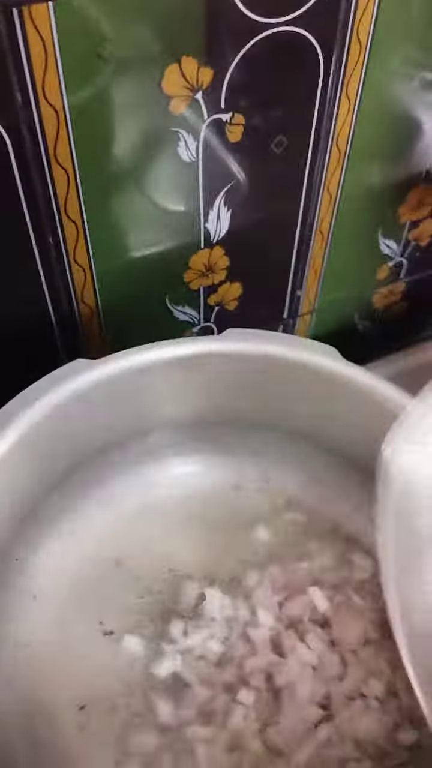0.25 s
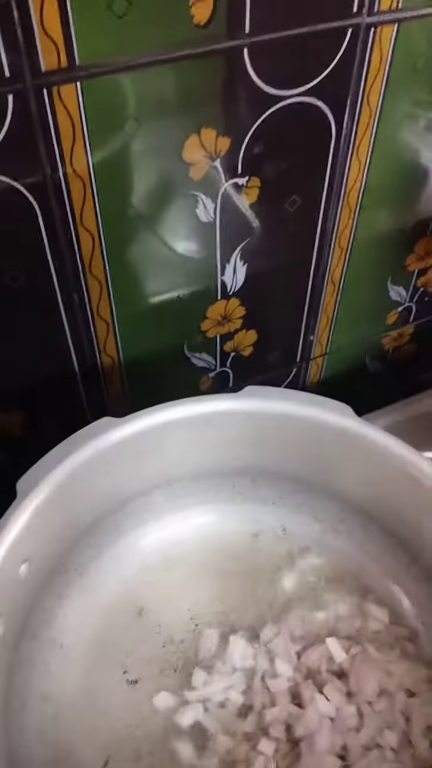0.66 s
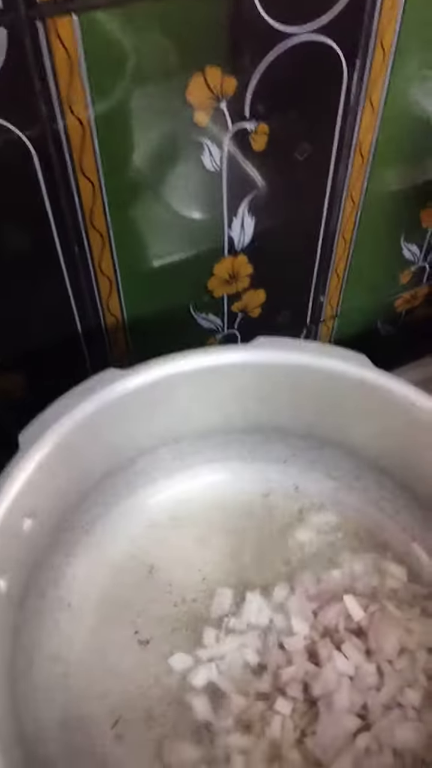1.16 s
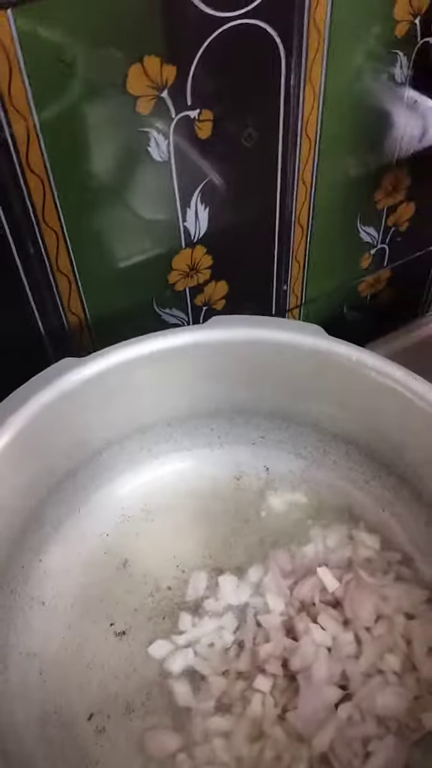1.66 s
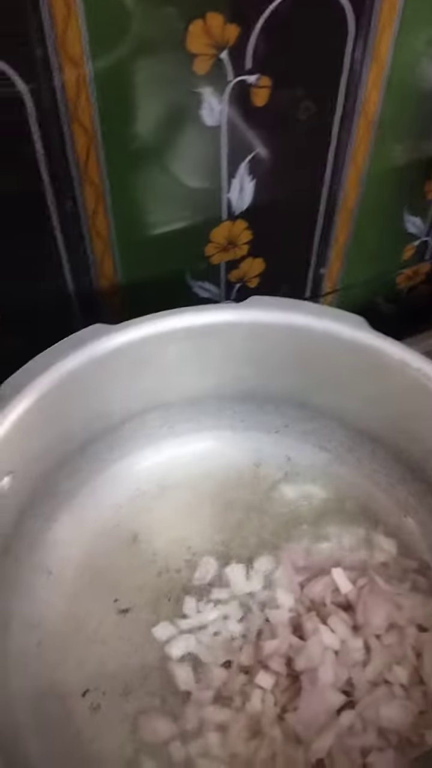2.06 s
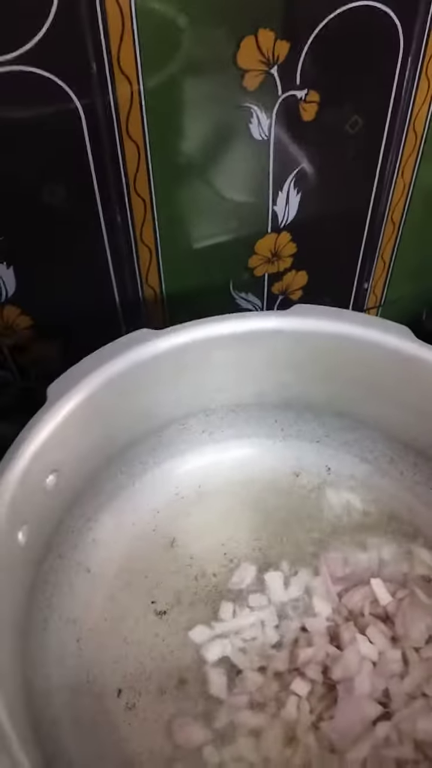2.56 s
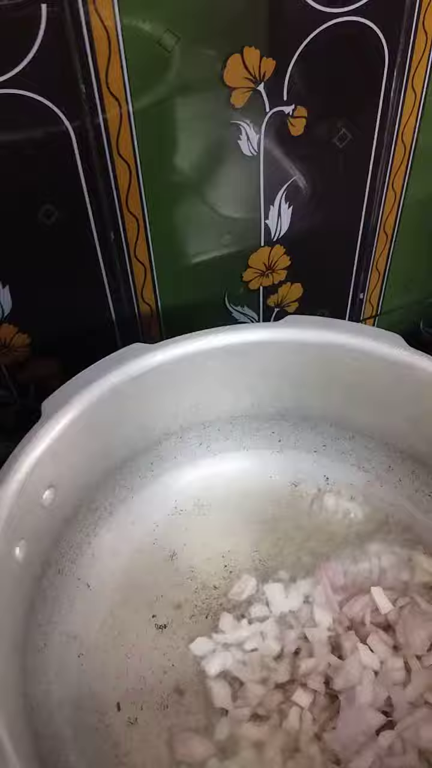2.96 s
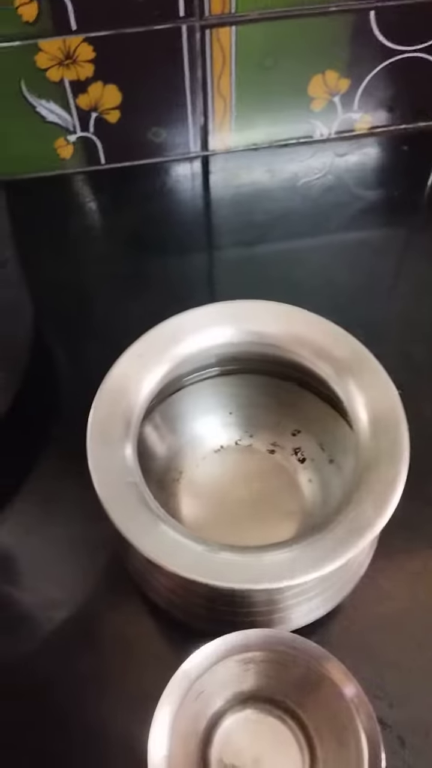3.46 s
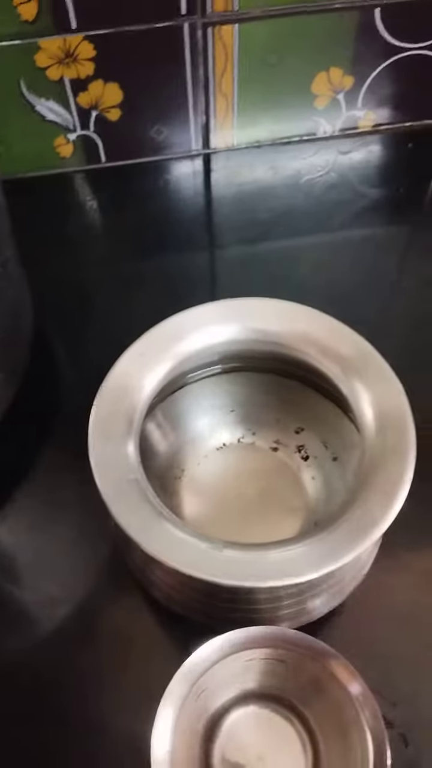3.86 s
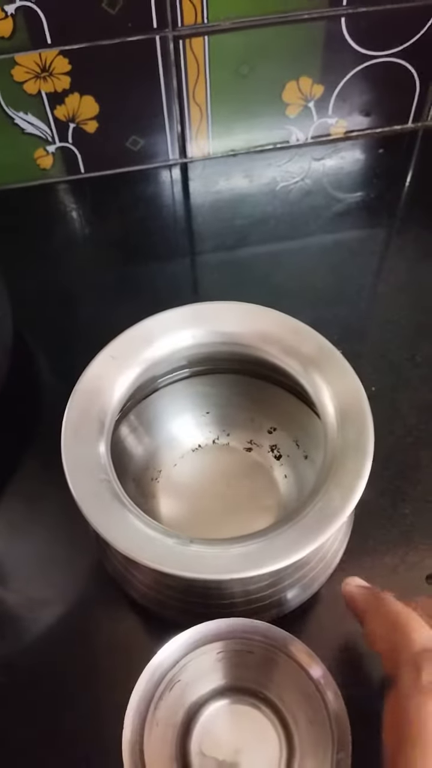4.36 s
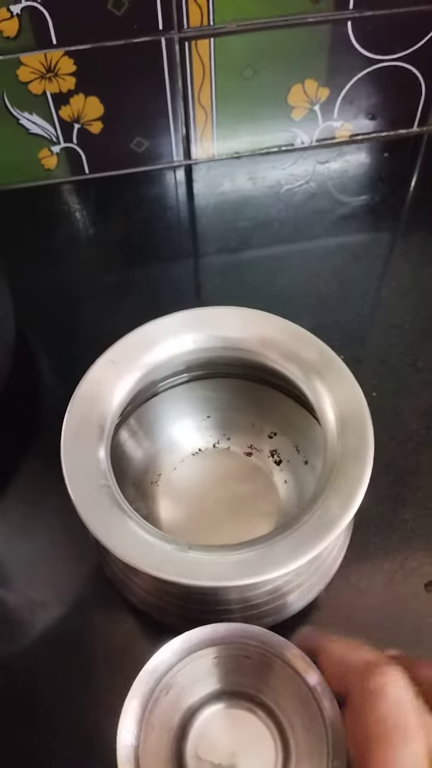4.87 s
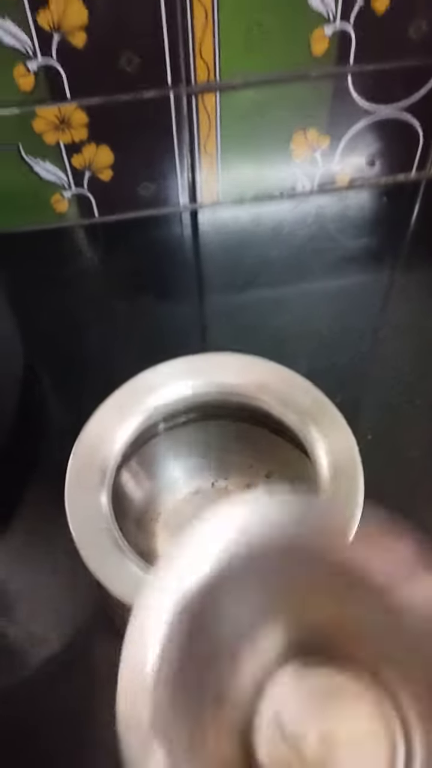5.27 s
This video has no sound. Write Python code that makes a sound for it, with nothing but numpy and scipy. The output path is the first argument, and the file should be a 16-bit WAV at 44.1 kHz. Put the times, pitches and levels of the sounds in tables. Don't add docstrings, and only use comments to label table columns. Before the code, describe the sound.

Very close to a wide metal pot, onions fry in hot oil with bright dense hiss, bubbling and sharp popping spits. Just after one second a steel bowl lands on a stone counter, rings, rocks and rattles to rest. At about three seconds the sound cuts hard to a quiet kitchen, with only a thin distant hiss and small steam spurts over faint air hum. Handheld phone microphone.

```python
import sys
import numpy as np
from scipy import signal
from scipy.fft import rfft, irfft, next_fast_len
from scipy.io import wavfile
from scipy.ndimage import uniform_filter1d, map_coordinates

SR = 44100
rng = np.random.default_rng(int(sys.argv[2]) if len(sys.argv) > 2 else 0)


def transcribe(signal):
    frames = np.atleast_2d(signal).T
    limited = np.clip(frames, -1, 1)
    pcm = np.round(limited * 32767).astype(np.int16)
    wavfile.write(sys.argv[1], SR, pcm)


def ratio_of_db(decibels):
    return 10 ** (np.asarray(decibels, float) / 20)


N = 243343
CUT_S = 3.1222

# [t/s, frying level/dB, bubbling level/dB]
FRYING = [(0.0, -19, 6.5), (0.24, -20.5, 7), (0.55, -20.5, 0), (0.62, -18.5, 5), (0.8, -20, 3.5),
          (1.53, -21, 9), (2.13, -20.5, 7.5), (2.48, -21, 4), (2.62, -20, -15), (2.9, -20.5, -21),
          (3.0, -20.5, -10)]
# [f/Hz, level/dB]
FRYING_COLOUR = [(400, -39), (700, -37.5), (1140, -22), (1520, -23), (1900, -16), (2900, -11), (4780, -16),
                 (6000, -14.5), (7200, -7.5), (8400, 1), (9300, -2), (11000, -8.5), (13000, -11.5),
                 (15800, -17)]
POT_HZ, POT_WIDTH_HZ, POT_DB, POT_DB_PER_S = 1153, 74, -24.5, -0.5
# [t/s, peak level/dB, low snap level/dB]
LOUD_SPITS = [(0.0143, -3, -22), (0.157, -5, -21), (0.2373, -7, -14), (0.3979, -4, -13), (0.41, -1, -15),
              (0.5236, -8, -18), (0.5994, -3, -20), (0.617, -1, -22), (0.6438, -6, -16), (0.7007, -4, -19),
              (0.788, -1, -25), (0.8888, -4, -22), (0.9142, -5, -23), (0.9297, -1, -24), (1.0055, 0, -25),
              (1.5049, -5, -20), (2.0687, -7, -10), (2.092, -5, -18), (2.2432, -6, -19), (2.3086, -1, -20),
              (2.4598, -6, -23), (2.613, -5, -21), (2.6458, -1, -25), (2.6802, -5, -13), (2.7152, -4, -18),
              (2.7565, -4, -23), (2.7805, -2, -25), (2.837, -6, -20), (2.8877, -4, -26), (2.9023, -4, -21)]
SMALL_DB, SMALL_SPREAD_DB, SNAP_DB, SNAP_SPREAD_DB = -14.5, 0, -24.5, 5.5
SPIT_RISE_S, SPIT_T60_S, PLOP_T60_S = .0004, .005, 0.0097
# [t/s, peak level/dB, f/Hz]
FAT_BUBBLES = [(0.408, -2.5, 3550), (0.7738, -5, 2920), (0.8395, -19, 4600), (0.995, -7, 4200),
               (1.0852, -6.5, 4400), (1.1792, -9, 3650), (1.3487, -2.5, 3940), (1.3714, -16, 3080),
               (1.395, -11, 3520), (1.5135, -14, 3000), (1.7465, -3, 2580), (1.7645, 0.5, 2450),
               (2.0672, -5, 3500), (2.716, -3, 4160)]
# [t/s, level/dB, t60/s]
FLOOR_TAPS = [
    (2.2117, -7, 0.024),
    (1.7, -18, .02),
    (2.3055, -12, 0.023),
    (1.066, -18, 0.016),
    (1.224, -15.5, .012),
    (0.41, -19.5, .01),
]
# [t/s, knock level/dB, body ring level/dB, rim ring level/dB]
CONTACTS = [(1.31, -9, -4, -26), (1.327, -16.5, -12.5, -29), (1.34, -13.5, -13.5, -38),
            (1.365, -16, -11, -38), (1.396, -22, -23, -36), (1.413, -23, -23, -45),
            (1.448, -34, -28.5, -50), (1.498, -41, -32, -49), (1.57, -10.5, -24, -18.5),
            (1.585, -13.5, -14.5, -17.5), (1.607, -16, -25, -24.5), (1.618, -17, -47, -23.5),
            (1.63, -16.5, -40, -23), (1.65, -19.5, -18, -28.5), (1.686, -18.5, -22, -27),
            (1.709, -21.5, -21, -34), (1.738, -24, -32, -43), (1.78, -8.5, -36, -12.5),
            (1.808, -19.5, -19, -23), (1.817, -13, -20.5, -18), (1.851, -14, -17, -15.5),
            (1.867, -15.5, -26, -21), (1.884, -17.5, -18, -17.5), (1.907, -19, -31, -27),
            (1.932, -22, -30, -24), (1.949, -14, -36, -22), (1.98, -16.5, -31, -24),
            (2.018, -21.5, -55, -23), (2.05, -22, -40, -38)]
# [f/Hz, level/dB, t60/s]
BOWL_MODES = [
    [(1573, 0, .5), (1527, -8, .12), (1376, -13, .1), (1294, -12, .1), (1460, -11, .1), (1226, -12, .1),
     (1725, -12, .08)],
    [(2720, 0, .45), (2767, -6, .3), (2692, -6, .3), (2634, -10, .3)],
    [(4744, 0, .6), (4446, -11, .4), (6347, -14, .4)],
    [(7533, 0, .2), (7574, -7, .25), (8900, -6, .12), (10041, -11, .12), (10750, -12, .08)],
]
# [t/s, level/dB of each rim family (3 columns), settling rate/1]
BOWL_LANDINGS = [
    (1.3, -1, -12, -4, 1.01),
    (1.56, -1, 3, 9, 0.94),
    (1.77, 2.3, -10, 2.5, 1.3),
]
RIM_FADE = 15, 45, 60
SCRAPE_BLUR = 2.5, 10, 3.8, 12
# [f/Hz, level/dB]
COUNTER_COLOUR = [(35, -44), (60, -11), (193, -26.5), (340, -9.5), (417, -14.5), (629, -11.5), (849, -6),
                  (1040, -8.5), (1260, -1), (1430, -7), (1550, -2), (2290, -18), (2600, -34), (3380, -53),
                  (5720, -120)]
# [t/s, peak level/dB, half length/s]
SLAB_HUM = [
    (1.41, -50.5, .06),
    (1.64, -54, 0.085),
    (1.88, -43, 0.14),
]
# [f/Hz, level/dB]
FAR_COLOUR = [(1530, -23), (2600, -5.5), (3600, -7.5), (4570, -5), (5940, -2), (7200, 0), (8650, 4.5),
              (10300, -1), (12000, -9), (15800, -9.5)]
FAR_DB = -45
# [t/s, peak level/dB, t60/s, width/octaves]
STEAM_SPURTS = [(3.5104, -39, 0.11, .33), (3.5713, -34, 0.23, .31), (3.6794, -37, 0.2, .35),
                (4.2094, -37, 0.16, .45), (4.334, -22.5, 0.16, 0.4), (4.348, -25, 0.25, 0.23),
                (4.4034, -31, 0.14, .31), (4.539, -40, 0.2, .45), (4.573, -24, 0.18, 0.34),
                (4.5837, -27.5, 0.29, .33), (4.813, -35, 0.3, 0.21), (4.869, -25.5, 0.19, 0.41),
                (5.023, -35, 0.18, .35), (5.071, -29.5, 0.22, .42), (5.254, -29, 0.14, .27),
                (5.3994, -32.5, 0.21, .4)]
SPURT_HZ = 8400
# [t/s, peak level/dB, f/Hz]
FAT_SQUEAKS = [
    (3.3388, -30, 6260),
    (3.3533, -27, 6060),
    (3.3777, -28, 5150),
    (3.3924, -36, 5200),
    (3.4994, -39, 4600),
    (3.6626, -33, 4600),
]
SQUEAK_OCTAVES, SQUEAK_T60_S = .13, .07
# [t/s, peak level/dB, f/Hz]
DULL_PUFFS = [
    (4.335, -44, 2480),
    (4.884, -41, 905),
    (5.299, -46, 2400),
    (5.359, -40.5, 1960),
]
PUFF_OCTAVES, PUFF_T60_S = .38, 0.54
# [f/Hz, level/dB]
FLAME_COLOUR = [(5.9, -18), (10, -8.5), (27, 10.5), (43, -13.5), (129, -10.5), (178, -19), (215, -12),
                (285, -18.5), (326, -6), (371, -14), (448, -11.5), (484, -8.5), (900, -15), (1170, -71.5),
                (1980, -120)]
# [f/Hz, level/dB]
AIR_COLOUR = [(5.9, -49), (10, 13.5), (27, 7.5), (81, -3.5), (163, -4), (260, -3.5), (414, -2.5),
              (534, -4.5), (707, -6), (1420, -10), (1630, -13), (2110, -10), (2600, -13.5), (3380, -42),
              (5720, -120)]
AIR_DB, FLAME_DB = -46.5, -42.5
# [f/Hz, width/Hz]
ROOM_MODES = [(220, 3), (260, 5.5), (332, 9.8), (536, 16)]
# [t/s, peak level/dB, half length/s]
ROOM_SWELLS = [
    [(3.14, -56, .07), (3.56, -56, 0.15), (4.38, -54, 0.038), (5.31, -59.5, 0.09)],
    [(3.85, -57, 0.11), (4.11, -48, 0.035), (4.93, -61, 0.075)],
    [(3.49, -62, 0.055), (4.01, -61, 0.057), (4.38, -58.5, 0.16), (4.86, -56.5, 0.16), (5.29, -61, 0.056)],
    [(3.19, -52, 0.066), (3.55, -60, 0.063), (4.28, -53, 0.068), (4.37, -46.5, 0.026), (4.81, -60.5, 0.16),
     (5.15, -53, 0.084), (5.35, -59, 0.076)],
]
REST_DB = -66
# [t/s, depth/dB, hold/s]
GAIN_DUCKS = [
    (0.412, -6.5, 0.103),
    (2.312, -8, 0.101),
]


def frying():
    level_db, low_db = curves(FRYING)
    draw = rng.random((3000, 2))
    size = ratio_of_db(np.minimum(-4.5 * np.log(draw[:, 1]), 11))
    kicks = np.bincount((draw[:, 0] * CUT_S * SR).astype(int), size, N)
    age = np.arange(200) / SR
    splatter = signal.fftconvolve(kicks, age * np.exp(-age / 0.00011))[:N] * rng.standard_normal(N)
    boil = ratio_of_db(0.25 * wobble(9.8) + 0.24 * wobble(90))
    bright = unit(coloured(.8 * patchy(depth_db=1.2) + .45 * unit(splatter), FRYING_COLOUR))
    draw = rng.random((1200, 3))
    size = ratio_of_db(np.minimum(-4 * np.log(draw[:, 2]), 12))
    bubble_hz = 2000 * 2 ** (1.5 * draw[:, 1])
    bubbles = grains(draw[:, 0] * CUT_S, bubble_hz, size, cycles=5.2, rise=.15)
    cavity_db = POT_DB + POT_DB_PER_S * np.arange(N) / SR + 1.5 * wobble(5.33)
    cavity = ratio_of_db(cavity_db) * narrow(POT_HZ, POT_WIDTH_HZ)
    return boil * ratio_of_db(level_db) * (ratio_of_db(1.0) * bright + ratio_of_db(low_db - 23.0) * unit(bubbles) + cavity)


def spits():
    out, t = np.zeros(N + SR), np.arange(SR // 40) / SR
    small_s = np.sort(rng.random(size=36)) * CUT_S
    small_db = rng.normal([SMALL_DB, SNAP_DB], [SMALL_SPREAD_DB, SNAP_SPREAD_DB], size=(36, 2))
    burst = ratio_of_db(-60 * t / SPIT_T60_S) * (1 - np.exp(-t / SPIT_RISE_S))
    for s, db, low_db in [*LOUD_SPITS, *np.c_[small_s, small_db]]:
        high_hz, low_hz = 8600 * ratio_of_db(rng.normal(0, 0.24)), 3400 * ratio_of_db(rng.normal(0, 1))
        click = np.sin(2 * np.pi * high_hz * t)
        click += ratio_of_db(low_db + 5.5) * np.sin(2 * np.pi * low_hz * t)
        click += .6 * rng.standard_normal(len(t)) * ratio_of_db(-60 * t / .004)
        place(out, s, ratio_of_db(db - 3.7) * burst / burst.max() * click)
    for s, db, hz in FAT_BUBBLES:
        splash = uniform_filter1d(rng.standard_normal(len(t)), size=4)
        body = np.sin(2 * np.pi * hz * t * (1 + 15 * t)) + 1.3 * splash
        place(out, s, ratio_of_db(db - 1.0 - 60 * t / PLOP_T60_S) * (1 - np.exp(-t / 0.0011)) * body)
    return signal.sosfilt(signal.butter(3, 1800, "high", fs=SR, output="sos"), out[:N])


def taps():
    out, t = np.zeros(N + SR), np.arange(SR // 20) / SR
    for s, db, t60 in FLOOR_TAPS:
        push = -1.8 * np.sin(2 * np.pi * 1700 * t) * ratio_of_db(-60 * t / 0.0017)
        spray = 0.8 * uniform_filter1d(rng.standard_normal(len(t)), size=4) * ratio_of_db(-60 * t / t60)
        answer = .12 * np.sin(2 * np.pi * POT_HZ * t) * ratio_of_db(-60 * t / .06)
        place(out, s, ratio_of_db(db) * (push + spray + answer))
    return signal.sosfilt(signal.butter(2, 430, "high", fs=SR, output="sos"), out[:N])


def bowl():
    s = np.array(CONTACTS)[:, 0]
    start = round(s[0] * SR)
    t = np.arange(start, start + SR) / SR
    last = np.clip(np.searchsorted(s, t) - 1, 0, None)
    age = np.maximum(t - s[last], 0)
    hand_stop = ratio_of_db(-60 * np.maximum(t - s[-1], 0) / 0.5)
    out = np.zeros(N)
    out[start:start + SR] = hand_stop * (ratio_of_db(0.7) * bowl_ring(t, last, age) + bowl_knocks(t, last, age))
    return out + slab_hum()


def bowl_ring(t, last, age):
    s, _, body_db, rim_db = np.transpose(CONTACTS)
    landings = np.array(BOWL_LANDINGS)
    landed, *share_db, settle = landings[np.searchsorted(landings[:, 0], s) - 1].T
    ring_db = [body_db]
    for db, fade in zip(share_db, RIM_FADE):
        ring_db.append(rim_db + db - fade * settle * (s - landed))
    rocking = t > s[8]
    ring = np.zeros(SR)
    for family_db, blur, modes in zip(ring_db, SCRAPE_BLUR, BOWL_MODES):
        for hz, db, t60 in modes:
            draw = rng.standard_normal((len(s), 2))
            level = ratio_of_db(family_db[last] + db + 1.3 * draw[last, 0] - 60 * age / t60)
            phase = 0.558 * np.cumsum(draw[:, 1] - draw[0, 1])[last] - .5 * np.pi
            swing = signal.lfilter([.016], [1, .016 - 1], level * np.exp(1j * phase))
            drag = uniform_filter1d(rng.standard_normal(SR), size=300)
            ring += np.real(swing * np.exp(2j * np.pi * hz * (t - s[0]) + 1j * blur * drag * rocking))
    return ring


def bowl_knocks(t, last, age):
    s, knock_db = np.transpose(CONTACTS)[:2]
    rattle = ratio_of_db(knock_db[last] - 8) * (0.7 * ratio_of_db(-60 * age / 0.016) + 0.96 * ratio_of_db(-60 * age / 0.36))
    rattle = signal.lfilter([.02], [1, .02 - 1], rattle)
    chatter = ratio_of_db(0.56 * np.clip(wobble(120.7)[:SR], -2, 2))
    knocks = rattle * unit(coloured(chatter * rng.standard_normal(SR), COUNTER_COLOUR))
    knocks += ratio_of_db(knock_db[last] + 0.5 - 60 * age / 0.023) * np.sin(2 * np.pi * 1880 * age) * (t > s[8])
    click = 1.6 * np.diff(uniform_filter1d(rng.standard_normal(SR + 1), size=5))
    return knocks + ratio_of_db(knock_db[last] - 9 - 60 * age / .006) * click


def slab_hum():
    t = np.arange(N) / SR
    return ratio_of_db(5) * swell(SLAB_HUM) * np.sin(2 * np.pi * 125 * t + 1.2 * wobble(9.4))


def far_pot():
    out = np.zeros(N + SR)
    out[:N] = ratio_of_db(FAR_DB - .7 + .5 * wobble(20)) * unit(coloured(patchy(depth_db=.7), FAR_COLOUR))
    t = np.arange(16384) / SR
    f = np.fft.rfftfreq(len(t), 1 / SR) + 1
    jets = [(s, db, SPURT_HZ, octaves, t60) for s, db, t60, octaves in STEAM_SPURTS]
    jets += [(*row, SQUEAK_OCTAVES, SQUEAK_T60_S) for row in FAT_SQUEAKS]
    jets += [(*row, PUFF_OCTAVES, PUFF_T60_S) for row in DULL_PUFFS]
    for s, db, hz, octaves, t60 in jets:
        band = np.exp(-.5 * (np.log2(f / hz) / octaves) ** 2)
        jet = unit(irfft(rfft(rng.standard_normal(len(t))) * band, len(t)))
        place(out, s, ratio_of_db(db - 9.5 - 60 * t / t60) * (1 - np.exp(-t / 0.0015)) * jet)
    return out[:N]


def kitchen():
    swells = np.zeros(N)
    for (hz, width), rows in zip(ROOM_MODES, ROOM_SWELLS):
        swells += (ratio_of_db(REST_DB) + swell(rows)) * narrow(hz, width)
    air = ratio_of_db(AIR_DB - 1.5) * unit(coloured(patchy(depth_db=0.65), AIR_COLOUR))
    flame = ratio_of_db(FLAME_DB) * unit(coloured(rng.standard_normal(N), FLAME_COLOUR))
    return np.where(np.arange(N) < CUT_S * SR, flame, air + swells)


def place(out, s, sound):
    out[round(s * SR):][:len(sound)] += sound


def unit(x):
    return x / np.sqrt(np.mean(x ** 2) + 1e-20)


def curves(rows):
    s, *cols = np.transpose(rows)
    return [np.interp(np.arange(N) / SR, s, c) for c in cols]


def wobble(rate):
    return map_coordinates(rng.standard_normal(int(N * rate / SR) + 4), [np.arange(N) * rate / SR])


def swell(rows):
    t = np.arange(N) / SR
    return sum(ratio_of_db(db) * np.exp(-((t - s) / half) ** 2) for s, db, half in rows)


def coloured(x, points):
    m = 2 ** 14
    f, db = np.transpose(points)
    hz = np.fft.rfftfreq(m, 1 / SR)
    gain_db = np.interp(np.log(hz + 1), np.log(f + 1), np.maximum(db, -70))
    cepstrum = irfft(np.log(ratio_of_db(gain_db)), m)
    cepstrum[1:m // 2] *= 2
    cepstrum[m // 2 + 1:] = 0
    response = irfft(np.exp(rfft(cepstrum)), m)[:m // 2]
    return signal.oaconvolve(x, response)[:len(x)]


def patchy(depth_db):
    z = signal.stft(rng.standard_normal(N), nperseg=256)[2]
    field = uniform_filter1d(rng.standard_normal(z.shape), size=6, axis=0)
    field = uniform_filter1d(field, size=8, axis=1)
    return unit(signal.istft(z * ratio_of_db(depth_db * unit(field)), nperseg=256)[1][:N])


def narrow(centre_hz, width_hz):
    m = next_fast_len(N)
    hz = np.fft.rfftfreq(m, 1 / SR)
    resonance = 1 / (width_hz + 2j * (hz - centre_hz))
    return unit(irfft(rfft(rng.standard_normal(m)) * resonance, m)[:N])


def grains(s, hz, size, cycles, rise, count=128):
    turns = hz[:, None] * np.arange(count) / SR
    shape = (1 - np.exp(-turns / 2.1)) * np.exp(-3 * turns / cycles)
    wave = size[:, None] * shape * np.sin(2 * np.pi * turns * (1 + rise * turns / cycles))
    at = (s * SR).astype(int)[:, None] + np.arange(count)
    return np.bincount(at.ravel(), wave.ravel(), N + SR)[:N]


def scene():
    close = frying() + spits() + taps() + bowl()
    return (np.where(np.arange(N) < CUT_S * SR, close, far_pot()) + kitchen())[None]


def top_cut(x):
    return signal.sosfilt(signal.butter(12, 15810, fs=SR, output="sos"), x)


def record(dry):
    t, gain_db = np.arange(N) / SR, np.zeros(N)
    for s, db, hold in GAIN_DUCKS:
        fall = np.clip((t - s) / .008, 0, 1)
        recovery = np.clip((s + hold + .012 - t) / .012, 0, 1)
        gain_db += db * fall * recovery
    mic = signal.sosfilt(signal.butter(2, 50, "high", fs=SR, output="sos"), dry)
    return top_cut(np.clip(mic * ratio_of_db(gain_db), -1, 1))


dry = scene()
out = record(dry)
transcribe(out)
```